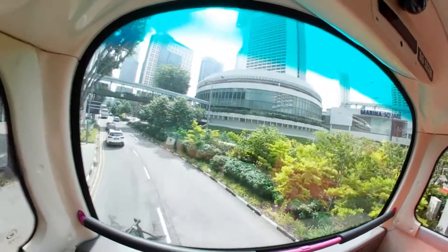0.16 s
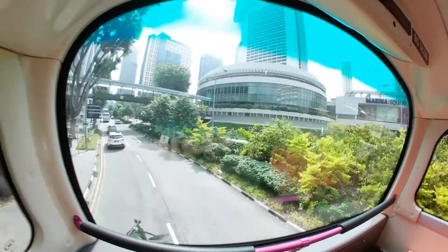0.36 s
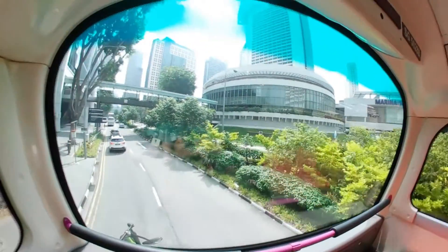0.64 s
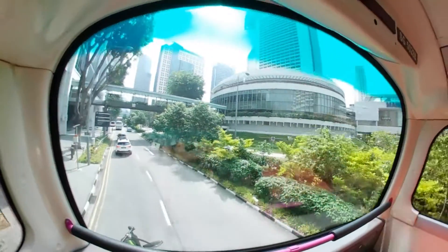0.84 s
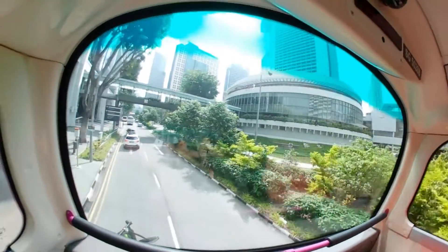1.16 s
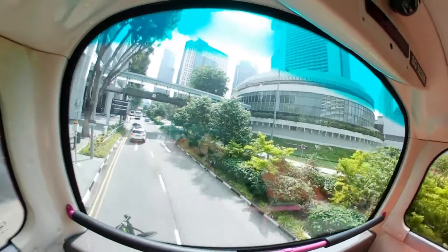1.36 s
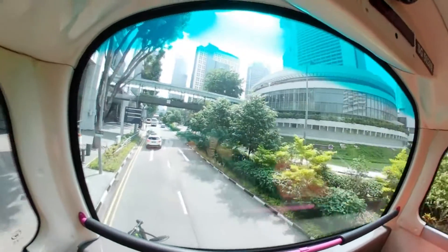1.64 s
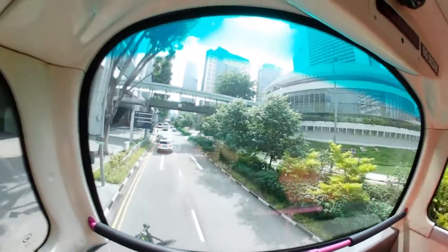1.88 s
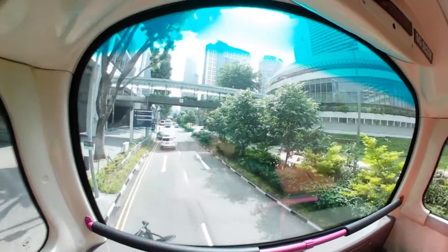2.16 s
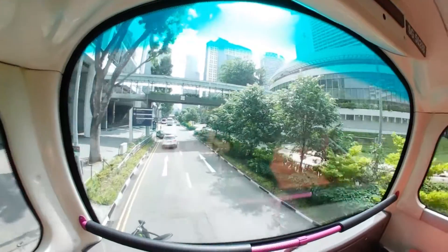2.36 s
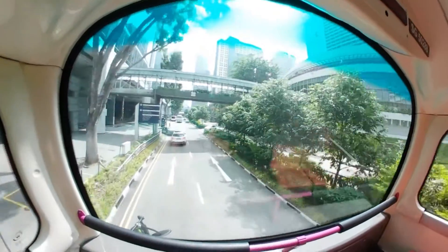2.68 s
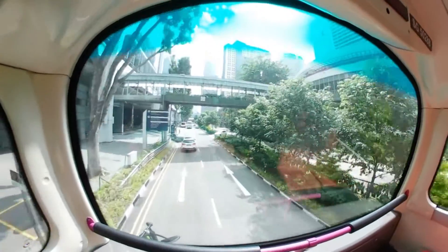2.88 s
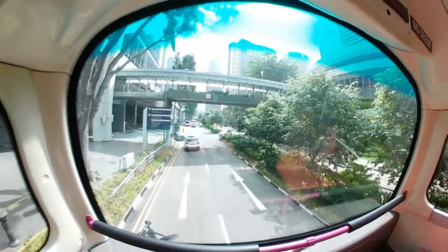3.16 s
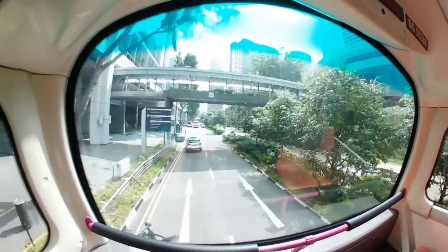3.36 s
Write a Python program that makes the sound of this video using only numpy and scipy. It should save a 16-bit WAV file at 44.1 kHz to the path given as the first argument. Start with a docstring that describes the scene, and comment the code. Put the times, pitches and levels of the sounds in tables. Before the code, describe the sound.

A moving bus rumbles and booms over uneven road, its interior trim rattling.

```python
"""A low drone and a dull panel knock come first, heard from the upper deck of a bus on a city road.
The engine is far behind, its uneven firings ringing an air cavity. Tyre and air noise fill the cabin
around the stereo microphone; loose trim chatters and ticks on the jolts, and one heavy part clunks.
Brief buzzes and hums come and go, and twice a faint, thin whistle sounds near 5.4 kHz.
From below comes the main sound: wheels hop and the hollow body booms over uneven tarmac."""
import sys
import numpy as np
from scipy import signal
from scipy.fft import rfft, irfft
from scipy.io import wavfile
from scipy.ndimage import uniform_filter1d

SR = 44100
rng = np.random.default_rng(int(sys.argv[2]) if len(sys.argv) > 2 else 0)


def dump_mix(stems):
    """Bounce the given channels to the path in sys.argv[1] as a 16-bit WAV at rate SR."""
    frames = np.atleast_2d(stems).T  # one column per channel
    limited = np.clip(frames, -1, 1)  # hard clip at full scale
    pcm = np.round(limited * 32767).astype(np.int16)
    wavfile.write(sys.argv[1], SR, pcm)


N = 155232

# Far behind and underfoot. Each row: time in seconds, floor panel in dB, engine drone in dB.
DRONE_LEVELS = [(0.0, -27, -15), (0.06, -21, -27.5), (1.04, -25, -23), (1.37, -15, -29), (1.4, -47, -24.5),
                (1.46, -15, -21), (1.75, -32, -25.5), (1.93, -17, -28.5), (2.0, -19, -19.5),
                (2.23, -20, -24), (2.34, -50, -34), (2.43, -24, -24), (3.24, -25.5, -31),
                (3.52, -24, -27.5)]
# Tyres and air. Each row: time in seconds, then rumble, roar, hiss and top of the hiss in dB.
ROAD_LEVELS = [(0.0, -40, -42.5, -51.5, -60), (0.13, -37, -47.5, -58.5, -66),
               (0.33, -35.5, -51, -60, -66.5), (0.52, -38.5, -46.5, -58, -65),
               (0.7, -40.5, -45, -55.5, -57), (0.94, -38.5, -50.5, -57, -71), (1.11, -42.5, -49, -59, -76),
               (1.32, -39, -49.5, -58.5, -68), (1.44, -32, -44.5, -54, -63), (1.55, -35, -41.5, -49, -67),
               (1.69, -40, -47, -54.5, -65), (1.78, -41, -48, -58, -71.5), (2.0, -38, -48, -58.5, -66.5),
               (2.19, -39, -41.5, -55, -65), (2.33, -35.5, -51.5, -55, -68), (2.5, -40, -45, -58.5, -73),
               (2.73, -42, -48, -59, -66), (2.99, -44, -51, -65, -73.5), (3.22, -42.5, -50.5, -62, -71.5),
               (3.52, -41, -50.5, -59.5, -78)]
# Tone colour of the cabin. Each row: frequency in Hz, relative noise density in dB.
CABIN_SPECTRUM = [(76, -36), (130, 10), (169, 2), (227, -3), (440, -7.5), (537, -20.5), (582, -12),
                  (833, -20.5), (1370, -34), (4040, -49), (7970, -55), (11900, -49), (15400, -51)]
# Stereo width at the microphone. Each row: frequency in Hz, side relative to mid in dB.
STEREO_WIDTH = [(100, -12), (250, -24.5), (500, -16.5), (1000, -8), (2000, 0), (15000, 0.5)]
# Brief buzzes and hums; the rows at 5400 and 5300 Hz are a faint, thin, narrow whistle.
# Each row: start and length in seconds, level in dB, centre and width in Hz.
BUZZES_AND_WHISTLES = [(.18, .055, -62, 11400, 400), (.635, .1, -57, 10000, 7000),
                       (.76, .5, -61, 4200, 400), (1.225, .025, -57, 3100, 150), (1.348, .05, -36, 420, 90),
                       (1.372, .05, -65, 11000, 300), (1.81, .025, -59, 3840, 100),
                       (1.888, .075, -61, 5400, 70), (2.148, .02, -53, 4950, 250),
                       (2.235, .03, -56, 6100, 200), (2.605, .04, -55, 4500, 300),
                       (2.68, .03, -56, 4200, 400), (2.78, .025, -60, 4800, 400),
                       (3.06, .13, -66, 5300, 200), (3.21, .08, -60, 2400, 700), (3.4, .11, -59, 3880, 500),
                       (3.42, .1, -61, 5100, 600)]
# Loose trim on the jolts. Each row: start in seconds, level in dB, centre and width in Hz.
TRIM_TICKS = [(0.015, -52, 11000, 3000), (.066, -47, 11600, 4000), (.13, -51, 8500, 3000),
              (0.174, -39, 11800, 4000), (0.241, -42, 4700, 2500), (0.288, -43, 4640, 1500),
              (0.4406, -37, 2800, 2980), (.511, -40, 11100, 7050), (0.548, -35.5, 3900, 2600),
              (.617, -32.5, 9450, 5030), (0.627, -33, 7660, 7100), (0.676, -39, 10500, 6000),
              (.72, -55, 8950, 7000), (.80, -50, 12000, 5000), (.95, -54, 13000, 4000),
              (1.276, -46, 10600, 4000), (.79, -42, 4080, 1500), (1.385, -42, 7000, 7000),
              (1.528, -31.5, 3000, 4000), (1.555, -38.5, 6250, 5000), (1.6466, -40, 4970, 5030),
              (2.059, -34.5, 5700, 5000), (2.146, -32.5, 5490, 6040), (2.2251, -32, 6200, 5960),
              (2.32, -46.5, 6000, 6000), (2.463, -48, 11800, 2500), (2.489, -43, 4000, 3000),
              (2.512, -43, 7000, 5000), (2.57, -42, 4000, 3000), (2.594, -34, 4600, 6950),
              (2.674, -43.5, 6500, 7000), (2.68, -50, 11500, 4000), (3.191, -45, 7100, 9100)]
# Panels on the jolts. Each row: start in seconds, level in dB, centre and width in Hz.
PANEL_KNOCKS = [(.01, -28, 500, 600), (.13, -35, 1000, 1200), (.235, -31, 880, 1500), (.29, -32, 350, 395),
                (.44, -38.5, 1200, 1500), (.795, -29, 348, 398), (1.30, -26, 300, 350),
                (1.33, -31.5, 600, 900), (1.348, -20.5, 300, 298), (1.355, -34.5, 1500, 1800),
                (1.38, -34, 700, 1500), (1.41, -34, 1400, 1800), (1.45, -31, 1190, 1500),
                (1.527, -30, 1090, 1510), (1.62, -30.5, 1180, 1520), (2.02, -33, 390, 503),
                (2.20, -31.5, 1370, 1500), (2.29, -29, 1040, 1430), (2.488, -31.5, 834, 1190),
                (2.575, -34, 1480, 1500), (2.65, -38, 1850, 1500)]
# Blows of the heavy part. Each row: start in seconds, level in dB.
CLUNK_BLOWS = [(0.5463, -23), (.555, -20), (0.566, -22), (.577, -30.5), (.588, -28.5), (.61, -31)]
# Modes of that part. Each row: frequency in Hz, relative level in dB, seconds to fade by 60 dB.
PART_MODES = [(195, 2, 0.094), (320, -1, 0.077), (485, 2, 0.043), (617, -2, 0.065), (753, 2.5, 0.052),
              (803, -2.5, 0.081), (924, -2, 0.038), (1090, -1, 0.017), (1530, -10, 0.031)]
# The bus shaking below the deck. Each row: time in seconds, wheel hop in dB, body boom in dB.
SHAKE_LEVELS = [(0.0, -41, -27), (0.08, -18, -32), (0.16, -14, -16), (0.26, -30, -13), (0.44, -13, -26),
                (0.56, -27, -21), (0.74, -20, -28), (1.17, -21, -21), (1.28, -23, -30), (1.37, -19, -11),
                (1.85, -28, -18), (1.99, -10, -17), (2.26, -17, -17), (2.32, -29, -18), (2.42, -15, -12),
                (2.46, -12, -27), (2.59, -13, -27), (2.62, -14, -15), (2.82, -36, -18), (2.92, -18, -25),
                (3.16, -38, -25), (3.26, -22, -16), (3.39, -36, -31), (3.52, -31, -18)]

ROAD_HZ = (280, 1300, 4600, 10600)  # rumble, roar, hiss, top of the hiss


def undb(db):
    return 10 ** (np.asarray(db) / 20)


def unit(x):
    return x / np.sqrt(np.mean(x ** 2))


def curve(table, column):
    """One column of a table, joined by straight lines in time."""
    rows = np.array(table)
    return np.interp(np.arange(N) / SR, rows[:, 0], rows[:, column])


def over_hz(table, hz):
    """A table's level at hz, interpolated over log frequency."""
    rows = np.array(table)
    return np.interp(np.log(hz), np.log(rows[:, 0]), rows[:, 1])


def band(x, hz, width_hz):
    """Steep resonance around hz, width_hz wide at 6 dB down."""
    f = np.fft.rfftfreq(x.shape[-1], 1 / SR) + 1e-3
    return irfft(rfft(x) / (1 + ((f - hz ** 2 / f) / width_hz) ** 2), x.shape[-1])


def walk(per_s):
    """Random levels held 1 / per_s seconds and smoothed twice; unit RMS."""
    hold = int(SR / per_s)
    steps = np.repeat(rng.standard_normal(N // hold + 1), hold)
    return unit(uniform_filter1d(uniform_filter1d(steps, hold), hold)[:N])


def spread(mid, side, hz):
    """Left and right at the microphone from mid and side, wider in the treble."""
    width = undb(over_hz(STEREO_WIDTH, hz))
    return np.array([mid + width * side, mid - width * side])


def bursts(table, envelope):
    """A stereo burst of band noise for each row, all with the same envelope."""
    out = np.zeros((2, N + SR))
    for start, db, hz, width_hz in table:
        pair = band(rng.standard_normal((2, len(envelope))), hz, width_hz) * envelope
        pair *= np.sqrt(np.mean(envelope ** 2)) / np.std(pair, axis=1, keepdims=True)
        mid, side = pair * undb(db) / 2
        at = int(start * SR)
        out[:, at:at + len(envelope)] += spread(mid, side, hz)
    return out[:, :N]


def engine_drone(firing_hz=99.83, jitter=0.0374, scatter_db=8.5, cavity_hz=95, width_hz=36.7):
    """Far behind the microphone, uneven firings and the road ring an air cavity."""
    timing, strength = rng.standard_normal((N // 200, 2)).T
    at = np.cumsum(SR / firing_hz * (1 + jitter * timing)).astype(int)
    pulses = np.zeros(N)
    pulses[at[at < N]] = undb(scatter_db * strength)[at < N]
    fired = unit(band(pulses, cavity_hz, width_hz))
    road_driven = unit(band(rng.standard_normal(N), cavity_hz, width_hz))
    return undb(curve(DRONE_LEVELS, 2)) * unit(fired + undb(0.5) * road_driven)


def floor_panel():
    """Underfoot, the road shakes the floor panel at its low resonance."""
    return undb(curve(DRONE_LEVELS, 1)) * unit(band(rng.standard_normal(N), hz=49.8, width_hz=30))


def road_noise(shared_db=1.5, flicker_db=1, treble_flicker_db=2.5):
    """Tyre and air noise all around: third-octave bands swell with the road; the treble flickers most."""
    centres = 140 * 2 ** (np.arange(21) / 3)
    weights = undb(over_hz(CABIN_SPECTRUM, centres)) * np.sqrt(centres)
    # The bands nearest each of ROAD_HZ share that range's power.
    nearest = np.argmin(abs(np.log(centres[:, None] / np.array(ROAD_HZ))), axis=1)
    levels = [curve(ROAD_LEVELS, k + 1) - 10 * np.log10(np.sum(weights[nearest == k] ** 2))
              for k in range(4)]
    noise = rng.standard_normal((2, N))
    out, shared = 0, shared_db * walk(per_s=12.82)
    for hz, weight in zip(centres, weights):
        position = np.interp(np.log(hz), np.log(ROAD_HZ), range(4))
        low = min(int(position), 2)
        db = levels[low] + (position - low) * (levels[low + 1] - levels[low])
        db += treble_flicker_db * position / 3 * walk(per_s=60)
        db += shared + flicker_db * walk(per_s=20)
        mid, side = unit(band(noise, hz, hz / 5)) * weight * undb(db)
        out += spread(mid, side, hz)
    return out


def trim_chatter(per_s=2200, scatter_db=3.5, above_hiss_db=-3.5):
    """Loose trim all over the deck: tiny rings of random pitch and place, louder on rough road."""
    count, hiss_hz = int(per_s * N / SR), ROAD_HZ[2]
    onset, pitch, phase = rng.random((count, 3)).T
    strength, place = rng.standard_normal((count, 2)).T
    hz = 1500 * 9 ** pitch
    size = undb(over_hz(CABIN_SPECTRUM, hz) + scatter_db * strength) * np.sqrt(hz)
    t = np.arange(SR // 40)[:, None] / SR
    decay_s = 8 * np.sqrt(hz / hiss_hz) / hz  # eight cycles at hiss_hz
    envelope = size * t / decay_s * np.exp(-t / decay_s)
    angle = 2 * np.pi * (hz * t + phase)
    rings = spread(envelope * np.sin(angle), envelope * np.sin(angle + 2 * place), hz)
    samples = ((onset * N).astype(int) + np.arange(len(t))[:, None]).ravel()
    out = np.array([np.bincount(samples, channel.ravel(), N + len(t))[:N] for channel in rings])
    treble = band(out, hiss_hz, hiss_hz)
    return out / np.std(treble) * undb(above_hiss_db + curve(ROAD_LEVELS, 3))


def buzzes_and_whistles(edge_s=0.006, flicker_db=3):
    """Buzzes, hums and a faint, thin whistle near 5.4 kHz: flickering noise bands, each held briefly."""
    out, t = 0, np.arange(N) / SR
    flicker = undb(flicker_db * walk(per_s=70))
    for start, length, db, hz, width_hz in BUZZES_AND_WHISTLES:
        gate = np.clip(np.minimum(t - start, start + length - t) / edge_s + 0.5, 0, 1)
        pair = band(rng.standard_normal((2, N)), hz, width_hz) * flicker
        mid, side = pair / np.std(pair[:, gate > 0], axis=1, keepdims=True) * gate * undb(db)
        out += spread(mid, side, hz)
    return out


def trim_ticks(rise_s=0.00087, decay_s=0.0047, tail_db=-11.5, tail_t60_s=0.29, ring_t60_s=0.1):
    """Trim strikes a panel: a bright tick, the panel's lower note, a cabin tail and metallic rings."""
    t = np.arange(SR // 3) / SR
    rise = np.minimum(t / rise_s, 1)
    tick_envelope = rise * (np.exp(-t / decay_s) + undb(tail_db - 60 * t / tail_t60_s))
    ring_envelope = rise * undb(-60 * t / ring_t60_s)
    panels = [(start, db - 3, 0.4 * hz, 0.4 * width_hz) for start, db, hz, width_hz in TRIM_TICKS]
    # Three faint rings, 250 Hz wide, fall at random within each tick's band.
    rings = [(start, db - 15, hz + offset * width_hz, 250)
             for start, db, hz, width_hz in TRIM_TICKS for offset in rng.random(3) - 0.5]
    return bursts(TRIM_TICKS + panels, tick_envelope) + bursts(rings, ring_envelope)


def panel_knocks(rise_s=0.0091, t60_s=0.26):
    """Cabin panels knock dully on the jolts."""
    t = np.arange(SR // 3) / SR
    return bursts(PANEL_KNOCKS, np.minimum(t / rise_s, 1) * undb(-60 * t / t60_s))


def clunk(rise_s=0.0015, scatter_db=2.5, side_db=-13.5):
    """Near the stereo centre a heavy part bounces; every blow rings the same modes in its own mix."""
    out, t = np.zeros((2, N)), np.arange(SR // 4) / SR
    rise = np.minimum(t / rise_s, 1)
    for start, db in CLUNK_BLOWS:
        at = int(start * SR)
        for hz, mode_db, t60_s in PART_MODES:
            detune, strength = rng.standard_normal(2)
            angle = 2 * np.pi * (hz * (1 + 0.02 * detune) * t + rng.random())
            pair = np.sin(angle) + undb(side_db) * np.outer([1, -1], np.cos(angle))
            envelope = rise * undb(db + mode_db + scatter_db * strength - 60 * t / t60_s)
            out[:, at:at + len(t)] += envelope * pair / 2
    return out


def hop_and_boom(hop_hz=12.5, boom_hz=25.5, waver=0.1, noise_db=-7.5):
    """Below the deck the wheels hop and the hollow body booms: two wavering swings with some noise."""
    out = 0
    for column, hz in ((1, hop_hz), (2, boom_hz)):
        cycles = np.cumsum(hz * (1 + waver * walk(per_s=6.8))) / SR
        swing = unit(np.sin(2 * np.pi * (cycles + rng.random())))
        noise = unit(band(rng.standard_normal(N), 1.144 * hz, hz / 2))
        out += undb(curve(SHAKE_LEVELS, column)) * unit(swing + undb(noise_db) * noise)
    return out


def scene(balance_db=0.45, right_lag_s=0.00008):
    """At the microphone the bass arrives slightly weaker on the left and slightly later on the right."""
    bass = hop_and_boom() + engine_drone() + floor_panel()
    late = np.interp(np.arange(N) - right_lag_s * SR, np.arange(N), bass)
    bass_pair = np.array([bass * undb(-balance_db / 2), late * undb(balance_db / 2)])
    return (bass_pair + road_noise() + trim_chatter() + buzzes_and_whistles()
            + trim_ticks() + panel_knocks() + clunk())


def record(dry, edge_s=0.003, roll_off_hz=13000, cut_hz=15450):
    """Soft start and end; the microphone rolls off at the top, then the top is cut."""
    t = np.arange(N) / SR
    fade = np.sin(np.pi / 2 * np.minimum(np.minimum(t, t[::-1]) / edge_s, 1)) ** 2
    soft = signal.sosfilt(signal.butter(3, roll_off_hz, fs=SR, output="sos"), dry * fade)
    return signal.sosfilt(signal.ellip(10, 0.2, 90, cut_hz, fs=SR, output="sos"), soft)


dry = scene()
out = record(dry)
dump_mix(out)
```